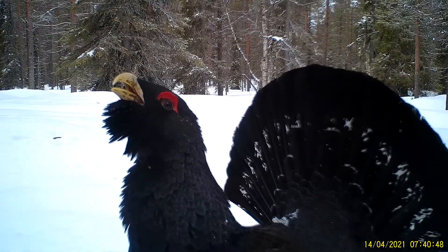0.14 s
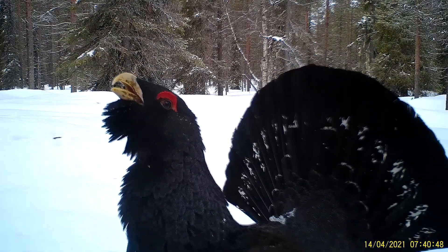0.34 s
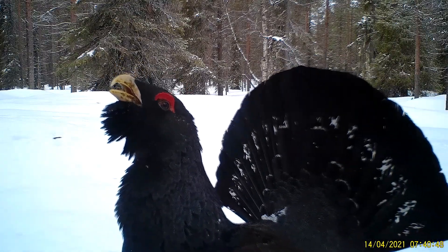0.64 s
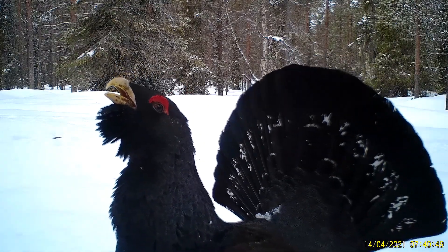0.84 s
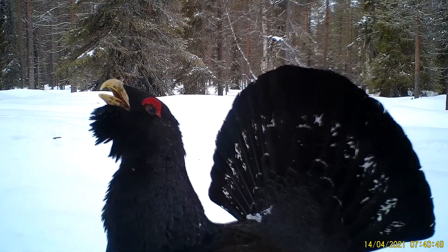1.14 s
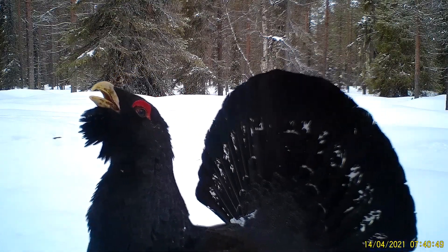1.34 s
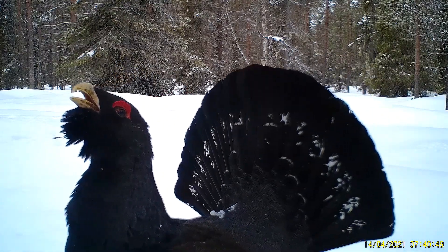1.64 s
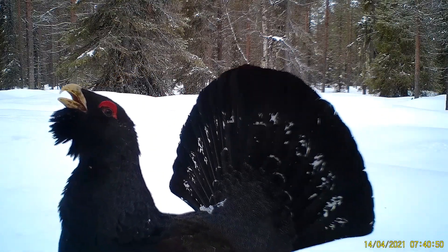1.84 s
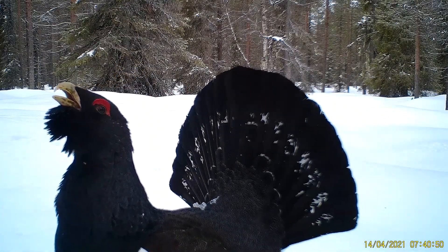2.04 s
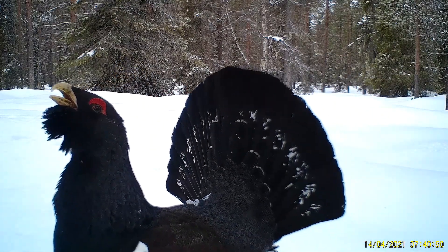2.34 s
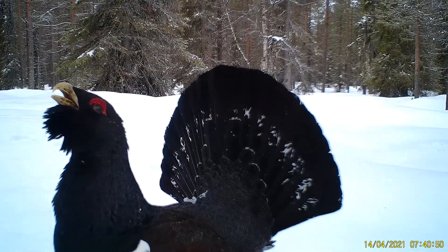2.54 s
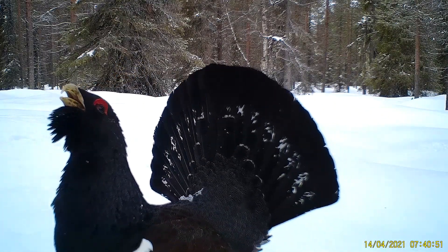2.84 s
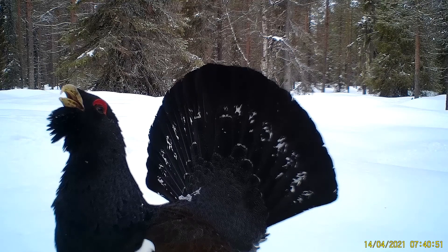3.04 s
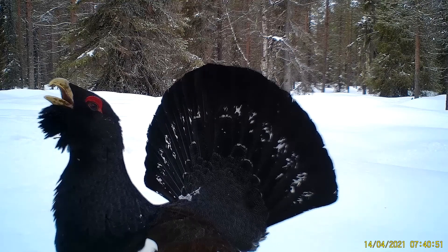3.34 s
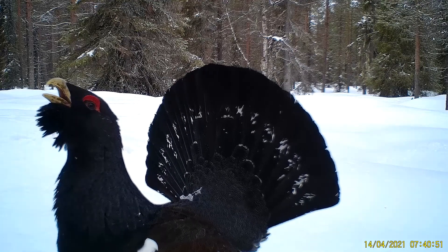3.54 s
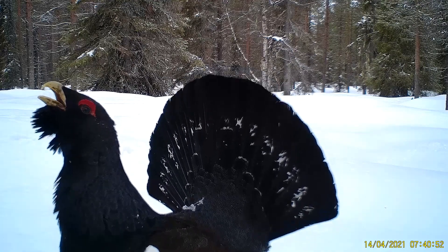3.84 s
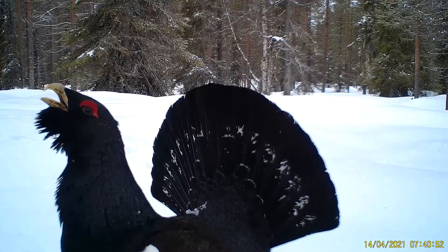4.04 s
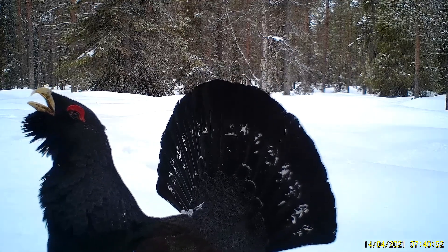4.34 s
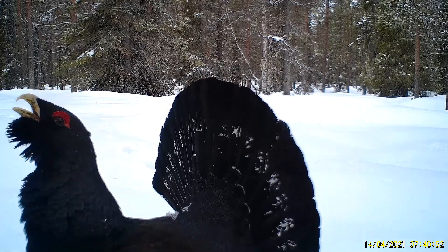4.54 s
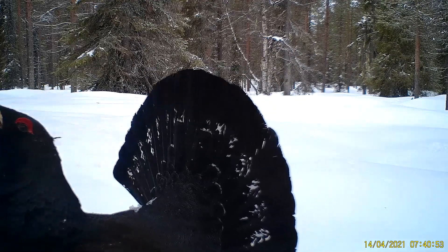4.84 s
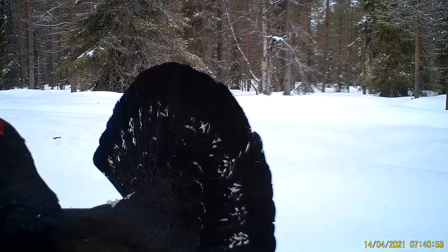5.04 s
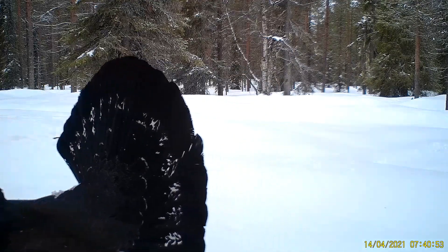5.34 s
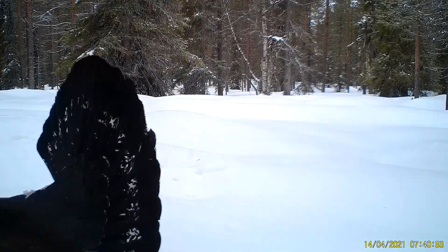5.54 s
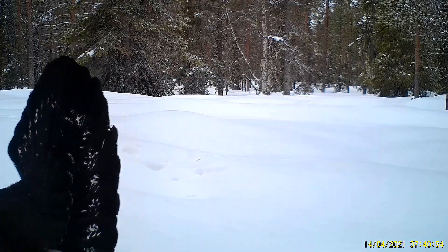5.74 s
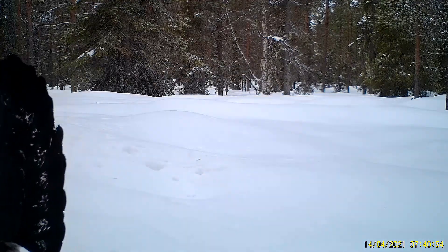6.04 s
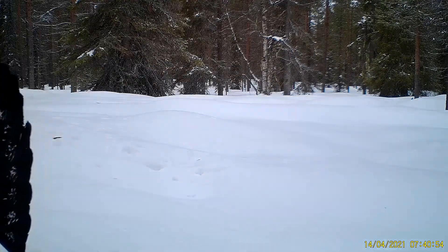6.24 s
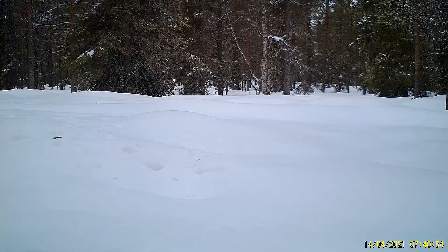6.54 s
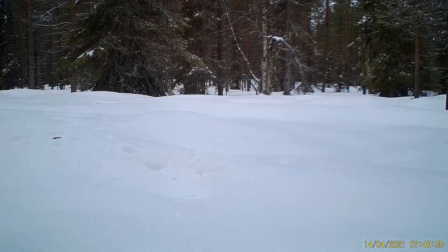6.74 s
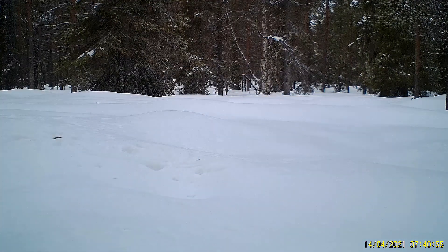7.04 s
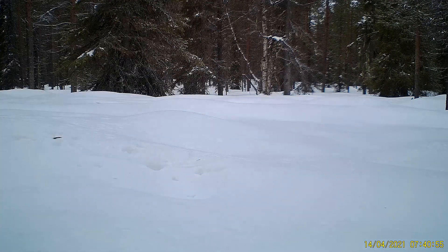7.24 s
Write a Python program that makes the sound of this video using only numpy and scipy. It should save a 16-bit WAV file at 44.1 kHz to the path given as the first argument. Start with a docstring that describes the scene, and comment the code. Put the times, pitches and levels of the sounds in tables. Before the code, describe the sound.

Light wind and feather crackles, a single sharp ringing pop from a large forest bird, then its plumage brushing close past over crusted snow.

```python
"""A capercaillie displays beside a mono trail camera in a snowy forest clearing.
Light wind stirs at the microphone throughout. Stiff feathers flick and crackle; faint scratchy
notes follow. At 3.2 s two snaps ring throat and beak: one sharp double pop, echoed by the trees.
The bird then struts past, its plumage rubbing in a long hiss, snow crust crunching underfoot."""
import sys
import numpy as np
from scipy import signal
from scipy.fft import rfft, irfft
from scipy.io import wavfile

SR = 44100
rng = np.random.default_rng(int(sys.argv[2]) if len(sys.argv) > 2 else 0)


def file_out(sig):
    """Save sig as 16-bit WAV at sys.argv[1]."""
    # one column per channel
    cols = np.atleast_2d(sig).T
    # limit, then scale
    lim = np.clip(cols, -1, 1)
    pcm = np.round(lim * 32767).astype(np.int16)
    wavfile.write(sys.argv[1], SR, pcm)


N = 326278

# breeze on the microphone between gusts: t/s, level/dB
BREEZE_LEVEL = [(0, -64), (1.4, -68), (3.1, -62), (4.3, -74), (5.3, -61), (7.4, -72)]
# gusts on the microphone: t/s, length/s, level/dB
GUSTS = [(.05, 0.14, -53), (.19, 0.19, -50), (.78, .1, -58), (1.21, 0.092, -58.5), (1.85, 0.15, -51.5),
         (2.08, 0.074, -52.5), (2.46, 0.18, -53), (2.78, 0.085, -59), (3.83, 0.16, -59), (4.8, 0.24, -58),
         (5.6, 0.14, -48), (6.39, 0.11, -54.5)]
# wind buffet spectrum: f/Hz, level/dB
WIND_SPECTRUM = [(7.1, -27), (12, 1.5), (38, -0.5), (61, -13.5), (92, -21.5), (120, -18), (160, -54.5),
                 (260, -120)]
# low rush of air in the clearing: t/s, level/dB
RUSH_LEVEL = [(0, -65), (.8, -67), (2, -64.5), (2.6, -66.5), (3.2, -67), (4.3, -68.5), (5, -66),
              (7.4, -65.5)]
# spectrum of air rush and body rustle: f/Hz, level/dB
RUSH_SPECTRUM = [(60, -2.5), (100, -3), (300, -7.5), (750, -14.5), (1150, -14), (1800, -23), (3000, -30)]
# steady hiss spectrum: f/Hz, level/dB
HISS_SPECTRUM = [(1000, -2.5), (2000, 0), (4000, -0.5), (7000, 0.5), (10000, -2), (14000, -0.5),
                 (16000, -7.5)]
# feathers flicking over each other: t/s, length/s, level/dB
FLICKS = [(.664, 0.017, -59.5), (.889, 0.013, -60.5), (.952, .007, -57.5), (1.074, 0.019, -57.5),
          (1.094, 0.035, -54.5), (1.2045, 0.0095, -53.5), (1.292, 0.02, -57), (1.381, 0.013, -56.5),
          (1.499, 0.023, -53.5), (1.529, 0.036, -53), (1.657, 0.02, -53.5), (1.959, 0.011, -58.5),
          (2.693, 0.0059, -57), (3.573, 0.0096, -58.5), (3.7605, 0.023, -41.5), (3.815, 0.04, -41),
          (3.854, .02, -47), (3.8925, 0.017, -41.5), (3.933, 0.023, -55), (4.432, .016, -60.5),
          (4.49, 0.014, -54), (4.8098, 0.0033, -41.5), (5.321, .009, -42), (6.2695, .016, -40),
          (6.3335, .022, -39.5), (6.7725, 0.0041, -49.5)]
# flick spectrum: f/Hz, level/dB
FLICK_SPECTRUM = [(180, -38), (300, -9.5), (773, -16.5), (1340, -11.5), (2770, -16), (3930, -8.5),
                  (4640, -9.5), (5210, -3), (7380, -0.5), (9010, -7), (12600, -12), (14800, -23),
                  (15800, -24)]
# pose shifts of the standing bird: t/s, time to release/s, level/dB
STIRS = [(.85, 2.25, -75.5), (3.85, 0.19, -71.5)]
# peaked rub spectrum of the wing: f/Hz, level/dB
WING_SPECTRUM = [(700, -19), (1100, -27.5), (1900, -16), (2800, -18), (4300, -10.5), (4800, -11),
                 (5500, -3.5), (6100, -4), (7200, 0), (8000, -2), (9500, -9), (11700, -11.5), (15500, -24)]
# wing or tail shifts dragging the plumage: t/s, time to release/s, level/dB
SWEEPS = [(1.46, 0.083, -59.5), (2.85, 0.049, -65), (3.77, 0.11, -49), (4.85, 0.043, -54), (5.2, .13, -48),
          (5.55, 0.16, -50), (5.7, 0.085, -47.5), (5.89, 0.12, -51.5), (6.06, 0.1, -50),
          (6.275, 0.092, -53), (6.44, .25, -50.5), (6.89, 0.26, -56.5), (7.19, 0.24, -57)]
# steady rub as the bird nears and passes: t/s, level/dB
PASSING_LEVEL = [(4.3, -86), (4.53, -64), (4.78, -56.5), (5.2, -51.5), (5.55, -49.5), (5.9, -51),
                 (6.25, -54.5), (6.74, -63.5), (6.95, -57)]
# broader rub spectrum, tail nearest: f/Hz, level/dB
TAIL_SPECTRUM = [(900, -17), (2600, -13.5), (3400, -7.5), (4100, -8.5), (5400, -1), (7600, 1), (9800, -3.5),
                 (11200, -9.5), (13000, -10), (15500, -25)]
# wing-to-tail crossfade: t/s, tail share/1
TAIL_SHARE = [(5.7, 0.05), (6.15, 0.5), (6.6, 0.75), (7.0, 1)]
# scratchy notes, three throat resonances each: t/s, length/s, level/dB, low f/Hz, mid f/Hz, high f/Hz
NOTES = [(1.72, .13, -65, 2380, 3670, 5720), (2.008, 0.1, -67, 2330, 3000, 3500),
         (2.14, 0.16, -68, 3240, 5800, 6900)]
# rasp spectrum ahead of the throat: f/Hz, level/dB
RASP_SPECTRUM = [(1800, 1.5), (2400, -2.5), (4000, -4.5), (7000, -2.5), (9000, -9)]
# snaps of the pop, the second harder and brighter: drive level/dB, roll-off f/Hz
SNAPS = [(1.5, 5600), (3.2, 8000)]
# peaks and notches of throat and open beak: f/Hz, width/Hz, gain/dB
THROAT = [(1290, 150, 5.5), (2310, 140, 11), (2954, 400, 14), (3600, 180, 8.5), (4070, 190, 11),
          (5260, 130, 10.5), (5650, 110, -10), (6370, 300, 20.5), (7150, 98, -12.5), (7710, 1000, 13.5),
          (8270, 400, 8), (9870, 230, -12.5), (11350, 270, 16.5), (12200, 6900, -19.5)]
# echoes off snow and forest edge: delay/s, level/dB
ECHOES = [(.012, -30.5), (.032, -36), (.07, -41.5), (.157, -45.5), (.197, -45.5)]
# crust crunching underfoot: t/s, length/s, level/dB
CRUNCHES = [(5.305, .04, -65), (6.272, 0.0064, -47.5), (6.338, 0.015, -46), (6.603, 0.036, -56),
            (6.67, 0.0065, -54.5), (7.115, 0.011, -57), (7.379, 0.0059, -48)]
# crunch spectrum: f/Hz, level/dB
CRUNCH_SPECTRUM = [(250, -4), (500, -12), (1000, -17), (1600, -2), (2400, -3), (3100, 3), (4000, 3.5),
                   (5000, -7), (9000, -28)]

TIME_S = np.arange(N) / SR
FREQ_HZ = np.arange(N // 2 + 1) * SR / N


def from_db(db):
    """dB to gain."""
    return 10 ** (np.asarray(db) / 20)


def unit_rms(x):
    """Scale to rms 1."""
    return x / np.sqrt(np.mean(x ** 2) + 1e-20)


def level(rows):
    """Gain curve from rows of t/s, level/dB."""
    return from_db(np.interp(TIME_S, *np.transpose(rows)))


def cut(x, hz, kind, order=2):
    """Causal low- or high-pass."""
    return signal.sosfilt(signal.butter(order, hz, kind, fs=SR, output="sos"), x + 1e-18)


def coloured(x, spectrum):
    """Apply a spectrum, 12 dB/octave skirts beyond its ends; rms 1."""
    hz, db = np.transpose(spectrum)
    f_hz = np.maximum(FREQ_HZ, 1)
    skirts = np.minimum(f_hz / hz[0], 1) ** 2 * np.minimum(hz[-1] / f_hz, 1) ** 2
    gain = from_db(np.interp(np.log(f_hz), np.log(hz), db))
    return unit_rms(irfft(rfft(x) * skirts * gain, N))


def resonance(x, hz, width_hz, db):
    """Ringing peak; notch for negative db."""
    cosine, width = np.cos(2 * np.pi * hz / SR), np.tan(np.pi * width_hz / SR)
    boost, dip = width * max(from_db(db), 1), width * max(from_db(-db), 1)
    return signal.lfilter([1 + boost, -2 * cosine, 1 - boost], [1 + dip, -2 * cosine, 1 - dip], x)


def flutter(rate_hz, depth_db):
    """Randomly wandering gain."""
    knots = rng.standard_normal(N)
    return from_db(depth_db * np.interp(TIME_S * rate_hz, np.arange(N), knots))


def slips(per_s):
    """Stick-slip impulses, random in size and time; rms about 1."""
    chance = np.clip(per_s / SR, 1e-4, 1)
    return (rng.random(N) < chance) * rng.standard_normal(N) / np.sqrt(chance)


def strokes(rows, rise_share, taper=0.71):
    """Gain of short rise-and-fall strokes; more taper softens the ends."""
    power = np.zeros(N)
    for start_s, length_s, db in rows:
        span = slice(int(start_s * SR), int((start_s + length_s) * SR) + 2)
        triangle = np.interp((TIME_S[span] - start_s) / length_s, [0, rise_share, 1], [0, 1, 0])
        power[span] += from_db(db) ** 2 * triangle ** taper
    return np.sqrt(power)


def swells(rows, attack_s, release_s):
    """Attack-hold-release gain; overlaps add in power."""
    power = np.zeros(N)
    for start_s, held_s, db in rows:
        attack = np.clip((TIME_S - start_s) / attack_s, 0, 1)
        release = np.clip(1 - (TIME_S - start_s - held_s) / release_s, 0, 1)
        power += (from_db(db) * attack * release) ** 2
    return np.sqrt(power)


def wind():
    """Breeze and gusts buffet the microphone."""
    breeze = level(BREEZE_LEVEL) * flutter(rate_hz=7.4, depth_db=3.5)
    gain = np.hypot(breeze, strokes(GUSTS, rise_share=0.48))
    return gain * coloured(rng.standard_normal(N), WIND_SPECTRUM)


def rush(pressure, body_max_db=-59.5, body_exponent=0.63):
    """Low rush of air; the body's dull rustle swells it with rub pressure."""
    body = from_db(body_max_db) * (pressure / pressure.max()) ** body_exponent
    return np.hypot(level(RUSH_LEVEL), body) * coloured(rng.standard_normal(N), RUSH_SPECTRUM)


def hiss(level_db=-71.5):
    """Faint steady hiss."""
    return from_db(level_db) * coloured(rng.standard_normal(N), HISS_SPECTRUM)


def feather_flicks(faint_per_s=4, faint_length_s=0.0095, faint_db=-66):
    """Vanes zip over each other barb by barb; faint random flicks fall between the clear ones."""
    starts_s = FLICKS[0][0] + np.cumsum(rng.exponential(1, size=60)) / faint_per_s
    faint = [(start_s, faint_length_s, faint_db) for start_s in starts_s]
    barbs = coloured(slips(per_s=22000), FLICK_SPECTRUM)
    return strokes(FLICKS + faint, rise_share=0.37, taper=1.63) * barbs


def feather_stir():
    """Light contact as the pose shifts: sparse slips crackle."""
    crackle = coloured(slips(per_s=1500), WING_SPECTRUM) * flutter(rate_hz=34, depth_db=4.5)
    return swells(STIRS, attack_s=0.073, release_s=0.13) * crackle


def rub_pressure():
    """Rub strength as a gain: passing bird plus sweeps."""
    return np.hypot(level(PASSING_LEVEL), swells(SWEEPS, attack_s=0.036, release_s=0.055))


def feather_rub(pressure, base_per_s=1500, added_per_s=36000):
    """Under firm contact the slips merge into a hiss; the wing passes first, then the tail."""
    barbs = slips(base_per_s + added_per_s * pressure / pressure.max())
    tail_share = np.interp(TIME_S, *np.transpose(TAIL_SHARE))
    wing = (1 - tail_share) * coloured(barbs, WING_SPECTRUM)
    tail = tail_share * coloured(barbs, TAIL_SPECTRUM)
    return pressure * (wing + tail) * flutter(rate_hz=90, depth_db=0.86)


def scratchy_notes():
    """A rasping pulse train through three throat resonances per note."""
    rasp = coloured(slips(per_s=3600), RASP_SPECTRUM)
    notes = np.zeros(N)
    for start_s, length_s, db, *peaks_hz in NOTES:
        note = rasp
        for hz in peaks_hz:
            note = resonance(note, hz, width_hz=260, db=12)
        notes += strokes([(start_s, length_s, db)], rise_share=0.3) * unit_rms(note)
    return notes * flutter(rate_hz=340, depth_db=2.0)


def pop(start_s=3.17263, gap_s=0.003095, chest_gain_db=-8.5):
    """Two snaps ring throat and beak; a weak dull knock comes through the chest."""
    snaps = np.zeros(N)
    for k, (db, rolloff_hz) in enumerate(SNAPS):
        click = irfft(np.exp(-2j * np.pi * FREQ_HZ * (start_s + k * gap_s)), N)
        snaps += from_db(db) * cut(click, rolloff_hz, "low")
    voice = cut(snaps, hz=1260, kind="high", order=12)
    for hz, width_hz, db in THROAT:
        voice = resonance(voice, hz, width_hz, db)
    knock = cut(snaps, hz=570, kind="low", order=6)
    knock = cut(knock, hz=200, kind="high", order=1)
    return voice + from_db(chest_gain_db) * knock


def forest_echo(x, near_db=-20.5, near_t60_s=0.1, far_db=-39, far_t60_s=0.7, smear_s=0.0048):
    """Near trunks scatter a short tail, far ones a faint long one; a few smeared echoes on top."""
    t_s = TIME_S[:SR]
    envelopes = [(near_db, from_db(-60 * t_s / near_t60_s)), (far_db, from_db(-60 * t_s / far_t60_s))]
    envelopes += [(db, np.exp(-np.abs(t_s - delay_s) / smear_s)) for delay_s, db in ECHOES]
    response = np.zeros(SR)
    for db, envelope in envelopes:
        response += from_db(db) * envelope / np.linalg.norm(envelope) * rng.standard_normal(SR)
    response = resonance(response, hz=4080, width_hz=1500, db=0.5)   # trees slightly favour low treble
    return cut(signal.fftconvolve(x, response)[:N], hz=6800, kind="low")


def snow_crunch():
    """Crust grains break underfoot."""
    return strokes(CRUNCHES, rise_share=0.24) * coloured(slips(per_s=6300), CRUNCH_SPECTRUM)


def scene():
    """Air, bird and echo; both channels identical."""
    pressure = rub_pressure()
    air = wind() + rush(pressure) + hiss()
    feathers = feather_flicks() + feather_stir() + feather_rub(pressure)
    bird = feathers + scratchy_notes() + pop() + snow_crunch()
    return np.tile(air + bird + forest_echo(bird), (2, 1))


def record(dry, cutoff_hz=15800):
    """Steep elliptic low-pass."""
    return signal.sosfilt(signal.ellip(10, 0.1, 70, cutoff_hz, fs=SR, output="sos"), dry)


dry = scene()
out = record(dry)
file_out(out)
```